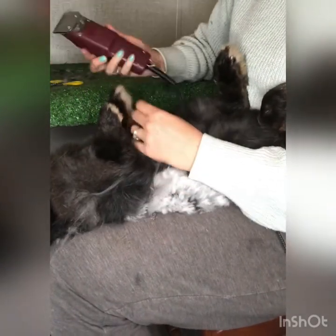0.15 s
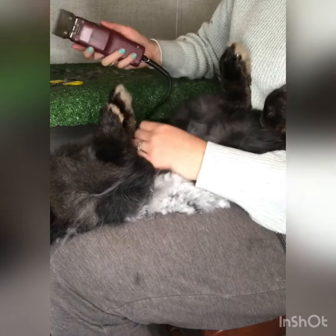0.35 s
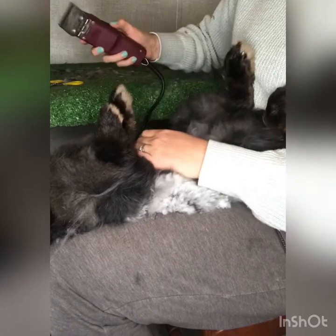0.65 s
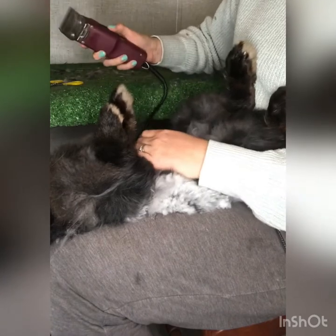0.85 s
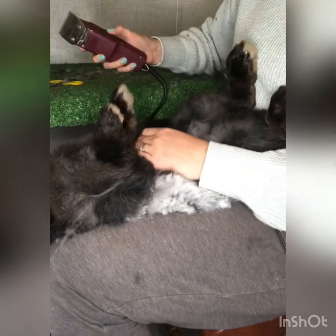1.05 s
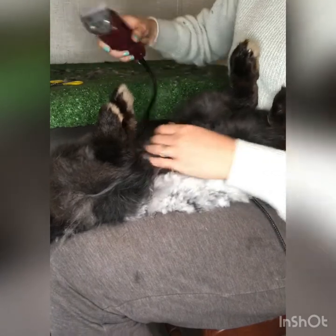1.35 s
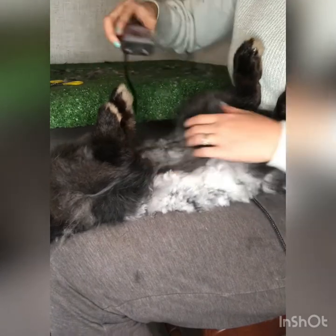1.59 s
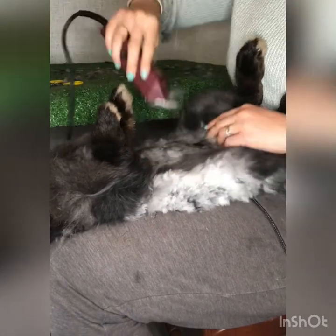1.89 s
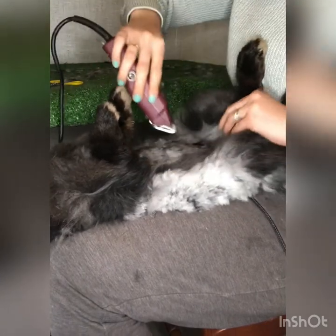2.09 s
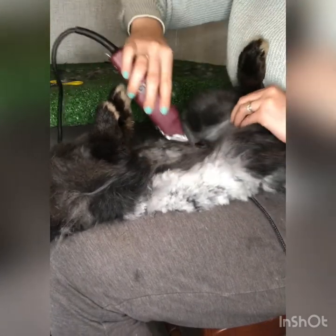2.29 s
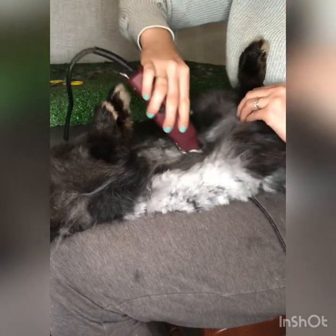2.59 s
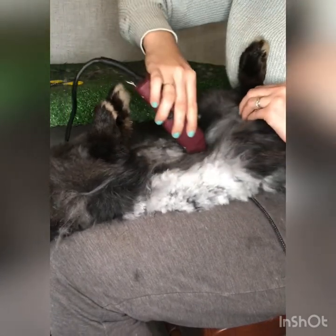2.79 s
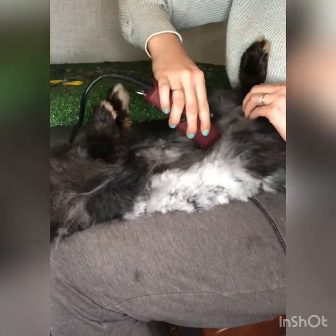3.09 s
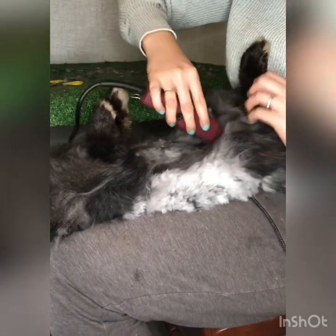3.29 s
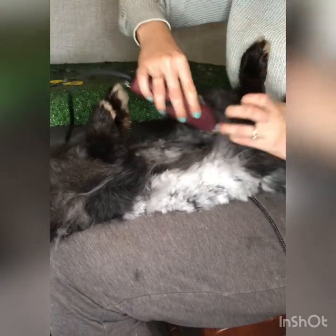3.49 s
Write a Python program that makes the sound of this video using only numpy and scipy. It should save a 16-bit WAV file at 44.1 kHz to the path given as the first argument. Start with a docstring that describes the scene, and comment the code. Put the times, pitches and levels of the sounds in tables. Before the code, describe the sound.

Animal hair clippers snap on after a sharp click, then hum and rattle continuously in a quiet room

```python
"""A sharp click is heard first, over faint room noise; then a switch clicks and electric animal clippers start up.
Held in the air, then turned down into a pet's fur, they buzz at 53 blade cycles a second.
Principle: a periodic blade force excites the housing as a harmonic series (hum), and its knocks excite
the steel as decaying rings and puffs of noise (clatter), darker once the blade points down.
Clicks are short rings with echoes; filtered noise gives the soft rustle of sleeves and cord as the hand moves."""
import sys
import numpy as np
from scipy import signal
from scipy.fft import rfft, irfft
from scipy.io import wavfile
from scipy.ndimage import uniform_filter1d

SR = 44100
rng = np.random.default_rng(int(sys.argv[2]) if len(sys.argv) > 2 else 0)


def pcm_store(signal):
    """Save signal as 16-bit PCM."""
    levels = np.round(np.clip(np.atleast_2d(signal), -1, 1) * 32767)
    wavfile.write(sys.argv[1], SR, levels.astype(np.int16).T)


N = 160965

# the motor runs up exponentially; amplitude is a power of its relative speed
START_S, SPIN_UP_S, LOUDNESS_POWER = .755, .028, 3.8
# running speed of the motor, which sags as the blade bites [t/s, blade rate f/Hz]
BLADE_RATE = [(1.45, 53.27), (1.9, 53.1), (2.42, 53.07), (2.62, 53.15), (3.02, 53.11), (3.17, 52.93),
              (3.45, 53.05)]
CYCLE_START_S = 2.5952  # a moment at which a blade cycle begins
# how far the clippers point down [t/s, share of a quarter turn 0-1]
TURNED_DOWN = [(1.42, 0), (1.7, 0.39), (2.0, 0.89), (2.35, 0.89)]

# housing hum below the clatter bands [t/s, level/dB]
HUM_LEVEL = [(.9, -47), (1.22, -47), (1.42, -49.5), (1.72, -50), (2.0, -47.5), (2.65, -45.5), (3.6, -46.5)]
# strengths of the hum partials in the air, at 1, 2, 3 .. times the blade rate [level/dB]
HUM_PARTIALS_ALOFT = [-13.5, -37, -23, -26, -22.5, -13, -15, -12, -11, -8.5, -5, -13, -4.5, -20.5, -9.5,
                      -18, -14.5, -7.5, -10, -3, -1, 4, -9, -9, -6.5, 3, 1.5, 0.5, -7.5, -0.5, 2, -3.5, -18,
                      -12, -1, -1.5, -0.5, -6.5]
# the same with the blade pointing down [level/dB]
HUM_PARTIALS_DOWN = [-24, -37, -16.5, -29, -10, -10.5, 0, -6.5, -6, -1, -1, -4.5, -3, -12.5, -10, -5, -9,
                     -5, -15.5, -8, -3.5, -.5, -0.5, -13, -20, -3, -13, -10, -11.5, -23, -2, -6.5, -10,
                     -9.5, -24, -5.5, -15.5, -17]
STROKE_PLACE, RETURN_LAG = .25, .48  # in cycles
# strengths relative to the forward stroke; they act on the phases of the partials alone
RETURN_ALOFT, RETURN_DOWN, SCATTER_ALOFT, SCATTER_DOWN = 1.43, .3, .86, 1.04
WAVER = .13  # depth of the slow change in each partial's amplitude
SMEAR_ORDER, TOP_ORDER = 14, 66  # partial where return and scatter reach full strength; highest partial
WHINE_DB, WHINE_RIPPLE_DB = -11, 1.5  # partials beyond the tables, relative to the steel's colour
WHINE_SHARE = .44  # power share of clean partials in the lowest clatter band

# knocks of the blade in one cycle [place in the cycle 0-1, level/dB]
KNOCKS = [(.16, -2.5), (.26, 0), (0.642, -6), (0.791, -2)]
KNOCK_SPREAD_DB, KNOCK_JITTER_S, STEEL_RING_S = 1.5, .00004, .00077
SCRAPE_DB, SCRAPE_S, CLATTER_ROOM_DB = -.5, .0013, -2
# resonances of the steel in the air [f/Hz, level/dB]
STEEL_ALOFT = [(1180, -34.5), (1960, -1), (2180, -11.5), (2370, -1.5), (2750, -6), (3040, 1), (3400, -6.5),
               (4670, -7), (9030, -18), (10500, -26), (15500, -23)]
# resonances of the steel pointing down [f/Hz, level/dB]
STEEL_DOWN = [(1180, -27), (2000, 1), (2180, -7), (2570, 2), (2840, -3.5), (3150, 3), (3710, -9),
              (4670, -7.5), (5000, -12), (5890, -6.5), (10500, -28), (12700, -22), (15500, -27.5)]
# clatter by band [t/s, low band level/dB, middle band level/dB, high band level/dB]
CLATTER_LEVEL = [(.95, -48.5, -53, -63), (1.2, -50.5, -53.5, -65), (1.45, -48, -52, -60.5),
                 (1.72, -49, -53, -62.5), (2.05, -54.5, -52, -64), (2.62, -50.5, -51.5, -64.5),
                 (3.08, -54.5, -51.5, -64.5), (3.4, -55.5, -53.5, -64)]
# edges of those three bands [f/Hz]
CLATTER_EDGES_HZ = [2000, 3500, 7500, 16500]
# loose rattle of the housing [f/Hz, level/dB]
RATTLE_COLOUR = [(200, -22), (550, -7), (900, -9.5), (1500, -1), (2400, -23)]
RATTLE_ALOFT_DB, RATTLE_DOWN_DB, RATTLE_ROOM_DB = -56.5, -62, 8

# bands that swell or fade as grip and position change [middle t/s, half length t/s, f/Hz, level/dB]
SHIFTS = [(0.92, 0.054, 620, 5.5), (1.38, .14, 1660, 5), (1.82, .17, 730, 6), (2.79, 0.34, 685, -9),
          (2.67, 0.29, 3260, 2.5), (3.39, .3, 2560, 5), (3.14, 0.22, 2150, -7.5)]
SHIFT_WIDTH_HZ, SHIFT_WIDTH_SHARE = 46, .03  # constant part of the width, and part proportional to f
# spells in which a loose part rings
# [middle t/s, half length t/s, f/Hz, level/dB, cycles between knocks, place in the cycle 0-1]
LOOSE_PARTS = [(1.383, 0.11, 1690, -49, 1, .69), (1.738, .09, 2560, -53.5, 2, .29),
               (1.939, 0.09, 4400, -60, 2, .26)]
LOOSE_WIDTH_HZ = 170

# clicks of switch and housing
# [t/s, direct energy level/dB, low edge f/Hz, body f/Hz, treble level/dB, ring decay t/s, room level/dB]
CLICKS = [(0.1529, -18.5, 1230, 2350, -12.5, 0.0018, -.5), (0.6163, -45.5, 1300, 2600, -7.5, .0009, -6),
          (0.7769, -16, 903, 1660, -6, 0.0014, -5), (1.0037, -12, 1400, 2520, -18, 0.00091, -6.5)]
SWITCH_PRESS_S, SWITCH_PRESS_DB = .009, -14  # plastic scrapes just before it snaps

# reverberation time of the room [f/Hz, T60 t/s]
ROOM_T60 = [(1000, 0.48), (5000, 0.43), (15000, 0.22)]
# reflections from near surfaces [delay t/s, level/dB]
ECHOES = [(.0032, -6.5), (.0094, -18), (0.022, -9.5), (0.049, -11.5)]
DIFFUSE_TAIL_DB = 1.5

# rustle of sleeves and cord [t/s, level/dB]
HANDLING_LEVEL = [(1.2, -71), (1.29, -60), (1.61, -60), (1.8, -64.5), (1.89, -57.5), (1.97, -72)]
# its spectrum [f/Hz, level/dB]
HANDLING_COLOUR = [(25, -26), (95, -0.5), (170, -11), (320, -6), (1200, -40)]
# faint brushing of the hand on the body of the clippers [t/s, level/dB]
BRUSH_LEVEL = [(.25, -68.5), (.48, -73)]
# its spectrum [f/Hz, level/dB]
BRUSH_COLOUR = [(300, -6), (1900, -7), (4000, -11.5), (15000, -24)]
# steady room noise [f/Hz, level/dB]
FLOOR_COLOUR = [(18, -46), (64, -26), (183, -16.5), (370, -23.5), (560, -22), (15500, -46.5)]
FLOOR_DB = -74.5
DRONE_HZ, DRONE_DB = 61.7, -70.5  # a low wavering hum in the room
CUTOFF_HZ = 15900


def clippers():
    """Common excitation: one motor phase drives hum, clatter and rattle, cross-faded as the hand turns."""
    run_up = 1 - np.exp(-np.maximum(np.arange(N) / SR - START_S, 0) / SPIN_UP_S)
    turns = np.cumsum(curve(BLADE_RATE) * run_up) / SR
    turns -= turns[round(CYCLE_START_S * SR)]

    # sine and cosine weights keep the summed power constant
    angle = curve(TURNED_DOWN) * np.pi / 2
    aloft, down = np.cos(angle), np.sin(angle)
    hum_aloft = hum(turns, run_up, HUM_PARTIALS_ALOFT, STEEL_ALOFT, RETURN_ALOFT, SCATTER_ALOFT)
    hum_down = hum(turns, run_up, HUM_PARTIALS_DOWN, STEEL_DOWN, RETURN_DOWN, SCATTER_DOWN)
    out = aloft * buzz(hum_aloft, clatter(turns, STEEL_ALOFT))
    out += down * buzz(hum_down, clatter(turns, STEEL_DOWN))
    out += rattle(turns) * np.hypot(aloft * amp(RATTLE_ALOFT_DB), down * amp(RATTLE_DOWN_DB))

    loose = sum(loose_part(turns, *row) for row in LOOSE_PARTS)
    return (shifting(out) + loose) * run_up ** LOUDNESS_POWER


def hum(turns, run_up, partials_db, steel, return_strength, scatter):
    """Fourier series: the periodic strokes drive the housing at whole multiples of the blade rate."""
    k = np.arange(1, TOP_ORDER + 1)
    steel_db = uniform_filter1d(read(steel, k * BLADE_RATE[-1][1]), size=7)
    whine_db = WHINE_DB + steel_db + WHINE_RIPPLE_DB * rng.standard_normal(len(k))
    db = np.r_[partials_db, whine_db[len(partials_db):]]

    # low partials stay in step as one thump; return stroke and reflections shift the higher phases
    reflected = np.exp(2j * np.pi * rng.random(len(k)))
    returning = return_strength * np.exp(-2j * np.pi * k * RETURN_LAG)
    smear = np.minimum((k / SMEAR_ORDER) ** 2, 1) ** 2
    strokes = 1 + smear * (returning + scatter * reflected)
    housing = causal(amp(np.r_[db[0], db, np.full(len(k), db.mean())]))[1:len(k) + 1]
    phases = np.angle(strokes * housing)

    tone = np.zeros(N)
    for order, phase in zip(k, phases):
        # during the run-up each partial climbs through the fixed resonances
        level = np.interp(order * run_up, k, amp(db)) * (1 + WAVER * wander(9))
        tone += level * np.cos(2 * np.pi * order * (turns - STROKE_PLACE) + phase)
    return tone


def clatter(turns, steel):
    """Forced resonance: knocks and scrapes, direct and reflected, take the spectrum of the steel."""
    rings, scrape = knocks(turns)
    direct = rings + amp(SCRAPE_DB) * scrape
    return colour(direct + amp(CLATTER_ROOM_DB) * room(direct), steel)


def knocks(turns):
    """Impulse response: each knock repeats its own ring every cycle and starts a fresh puff of noise."""
    rings, push = np.zeros(N), np.zeros(N)
    cycles = np.arange(np.ceil(turns[0]), np.floor(turns[-1]) + 1)
    for place, db in KNOCKS:
        late, size = rng.standard_normal((2, len(cycles)))
        at = np.interp(cycles + place, turns, np.arange(N)) + late * KNOCK_JITTER_S * SR
        # sinc pulses place each knock between samples
        near = at.astype(int)[:, None] + np.arange(-8, 9)
        strength = amp(db + KNOCK_SPREAD_DB * size) * (at < N - 1)
        pulses = np.sinc(near - at[:, None]) * strength[:, None]
        train = np.bincount(np.clip(near, 0, N - 1).ravel(), pulses.ravel(), N)
        rings += signal.oaconvolve(train, ring(STEEL_RING_S))[:N]
        push += train
    envelope = signal.lfilter([1], [1, -np.exp(-1 / (SCRAPE_S * SR))], push)
    return unit(rings), unit(envelope * rng.standard_normal(N))


def buzz(tone, steel):
    """Spectral division: hum fills the low end, mixes with clatter in the middle, and yields the treble."""
    low, mid, high, top = CLATTER_EDGES_HZ
    whine = np.sqrt(WHINE_SHARE) * band(tone, low, mid) + np.sqrt(1 - WHINE_SHARE) * band(steel, low, mid)
    parts = unit(whine), band(steel, mid, high), band(steel, high, top)
    bright = sum(amp(curve(CLATTER_LEVEL, axis=k + 1)) * part for k, part in enumerate(parts))
    lowpass = signal.butter(10, low, fs=SR, output="sos")
    return amp(curve(HUM_LEVEL)) * unit(signal.sosfilt(lowpass, tone)) + bright


def rattle(turns):
    """Modulated noise: knock-driven puffs and their echoes take the spectrum of the loose housing."""
    scrape = knocks(turns)[1]
    return colour(scrape + amp(RATTLE_ROOM_DB) * room(scrape), RATTLE_COLOUR)


def shifting(x):
    """Time-varying filtering: narrow bands of the buzz swell and fade as grip and position change."""
    f, z = np.fft.rfftfreq(N, 1 / SR), rfft(x)
    out = x.copy()
    for middle_s, half_s, hz, db in SHIFTS:
        width_hz = SHIFT_WIDTH_HZ + SHIFT_WIDTH_SHARE * hz
        narrow = irfft(z * np.exp(-((f - hz) / width_hz) ** 2), N)
        out += (amp(db * spell(middle_s, half_s)) - 1) * narrow
    return out


def loose_part(turns, middle_s, half_s, hz, db, every, place):
    """Resonance under periodic impulses: for a spell, one mode is struck every `every` cycles."""
    count = np.floor((turns - place) / every)
    impulses = np.diff(count, prepend=count[0])
    return amp(db) * spell(middle_s, half_s) * unit(resonate(impulses, hz, LOOSE_WIDTH_HZ))


def click(start, db, low_hz, body_hz, treble_db, ring_s, room_db):
    """Transient excitation: plastic scrapes, snaps into a short ring, and is reflected by the room."""
    t = np.arange(N) / SR - start
    snap = np.roll(np.pad(ring(ring_s, size=7), (0, N))[:N], round(start * SR))
    press = rng.standard_normal(N) * np.exp(-abs(t) / SWITCH_PRESS_S) * (t < 0)
    shape = [(low_hz / 2, -30), (low_hz, -7), (body_hz, 0),
             (4000, treble_db), (6500, treble_db - .5), (10000, treble_db - 13)]
    x = colour(snap + amp(SWITCH_PRESS_DB) * press / np.linalg.norm(press), shape)
    x *= amp(db) / np.linalg.norm(x)
    return x + amp(room_db) * room(x)


def room(x):
    """Reverberation: discrete early reflections and a diffuse tail whose decay depends on frequency."""
    hz, t, z = signal.stft(rng.standard_normal(SR // 2), SR, nperseg=256)
    decay = amp(-60 * t / read(ROOM_T60, hz)[:, None])
    response = signal.istft(z * decay * (t > .005), SR, nperseg=256)[1]
    response *= amp(DIFFUSE_TAIL_DB) / np.linalg.norm(response)
    for delay_s, db in ECHOES:
        response[int(delay_s * SR)] += amp(db)
    return signal.oaconvolve(x, response / np.linalg.norm(response))[:N]


def handling():
    """Friction noise: sleeves and cord rustle, and the hand brushes the clippers."""
    sleeve, hand = rng.standard_normal((2, N))
    rustle = amp(curve(HANDLING_LEVEL)) * colour(sleeve, HANDLING_COLOUR)
    return rustle + amp(curve(BRUSH_LEVEL)) * colour(hand, BRUSH_COLOUR)


def background():
    """Stationary filtered noise, with a low tone wavering in frequency and amplitude."""
    hz = DRONE_HZ + 1.44 * wander(12)
    drone = np.sqrt(2) * np.sin(2 * np.pi * np.cumsum(hz) / SR) * (1 + .3 * wander(7.6))
    return amp(FLOOR_DB) * colour(rng.standard_normal(N), FLOOR_COLOUR) + amp(DRONE_DB) * drone


def amp(db):
    """Level definition: decibels to amplitude ratio."""
    return 10 ** (np.asarray(db) / 20)


def unit(x):
    """Normalisation to rms 1."""
    return x / np.sqrt(np.mean(x ** 2) + 1e-20)


def curve(rows, axis=1):
    """Linear interpolation of one column of a time table, at every sample."""
    rows = np.array(rows)
    return np.interp(np.arange(N) / SR, rows[:, 0], rows[:, axis])


def read(points, hz):
    """Interpolation of a spectrum table on a logarithmic frequency axis."""
    f, value = np.transpose(points)
    return np.interp(np.log(hz + 1), np.log(f + 1), value)


def causal(gain):
    """Minimum phase: the Hilbert transform of log magnitude gives the phase of a causal response."""
    log_gain = np.log(np.maximum(gain, 1e-5))
    mirrored = np.r_[log_gain, log_gain[-2:0:-1]]
    return np.exp(np.conj(signal.hilbert(mirrored)))[:len(gain)]


def colour(x, points):
    """Linear filtering by a spectrum table, scaled to rms 1."""
    taps = irfft(causal(amp(read(points, np.fft.rfftfreq(4096, 1 / SR)))))
    return unit(signal.oaconvolve(x, taps)[:N])


def band(x, lo, hi):
    """Ideal band-pass filtering, scaled to rms 1."""
    hz = np.fft.rfftfreq(N, 1 / SR)
    return unit(irfft(rfft(x) * (hz > lo) * (hz < hi), N))


def wander(rate_hz):
    """Slow random fluctuation: straight lines between normal random values at the given rate."""
    knots = rng.standard_normal(400)
    return np.interp(np.arange(N) / SR * rate_hz, np.arange(len(knots)), knots)


def ring(decay_s, size=25):
    """Dense modes: a decaying noise burst, its spectrum evened over `size` bins."""
    t = np.arange(1024) / SR
    z = rfft(rng.standard_normal(len(t)) * np.exp(-t / decay_s))
    burst = irfft(z / np.sqrt(uniform_filter1d(abs(z) ** 2, size=size)))[:512]
    return burst / np.linalg.norm(burst)


def resonate(x, hz, width_hz):
    """Heterodyne resonance of gain 1: shift down to zero frequency, smooth, shift back."""
    spin = np.exp(2j * np.pi * hz * np.arange(N) / SR)
    r = np.exp(-np.pi * width_hz / SR)
    return 2 * (spin * signal.lfilter([1 - r], [1, -r], x / spin)).real


def spell(middle_s, half_s):
    """Gaussian envelope of height 1."""
    return np.exp(-((np.arange(N) / SR - middle_s) / half_s) ** 2)


def scene():
    """Superposition of all sources at one listening point."""
    clicks = sum(click(*row) for row in CLICKS)
    return (clippers() + clicks + handling() + background())[None]


def record(dry):
    """Band limitation by a linear-phase low-pass filter."""
    taps = signal.firwin(511, CUTOFF_HZ, window=("kaiser", 9), fs=SR)
    return signal.oaconvolve(dry, taps[None], "same")


dry = scene()
out = record(dry)
pcm_store(out)
```